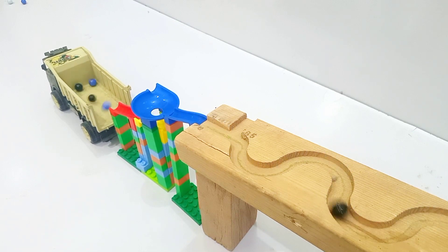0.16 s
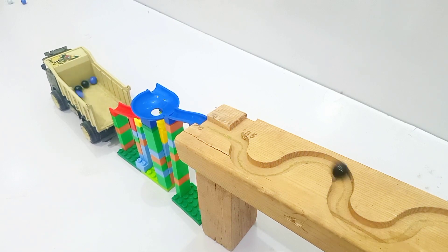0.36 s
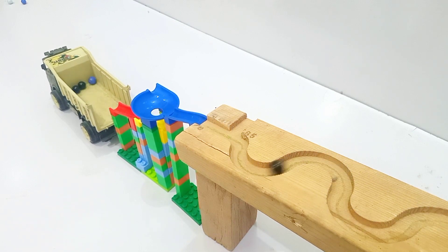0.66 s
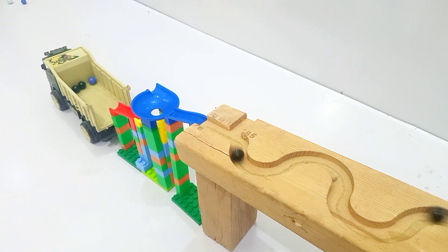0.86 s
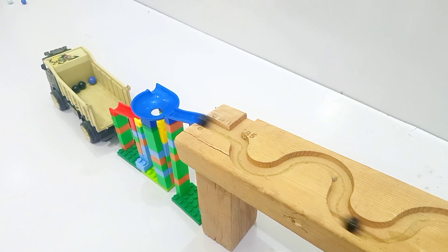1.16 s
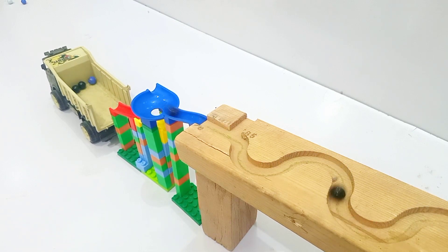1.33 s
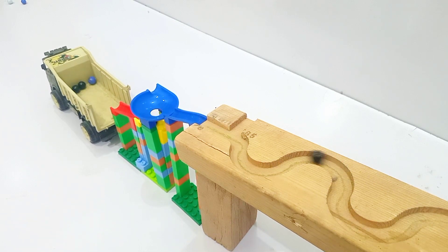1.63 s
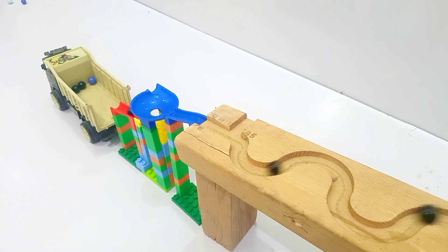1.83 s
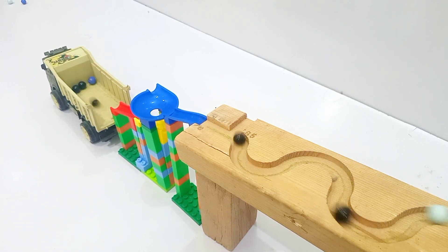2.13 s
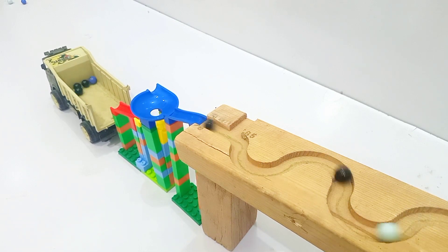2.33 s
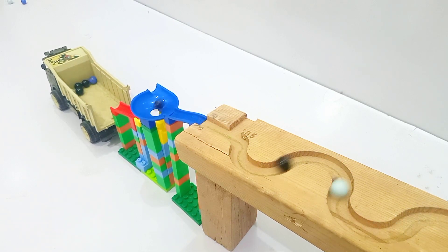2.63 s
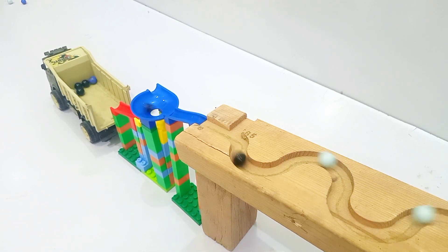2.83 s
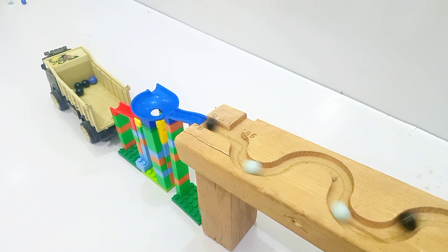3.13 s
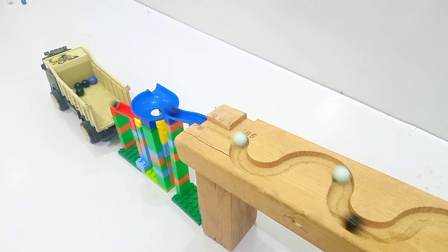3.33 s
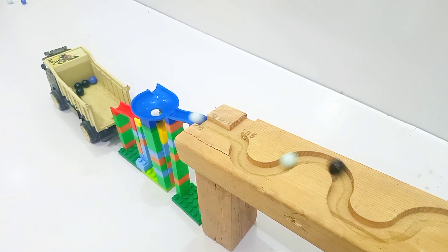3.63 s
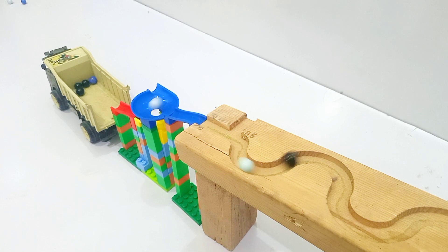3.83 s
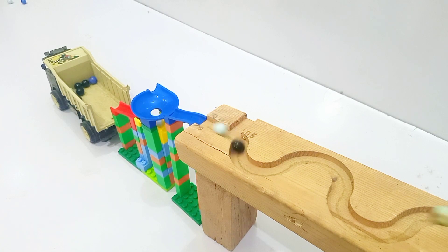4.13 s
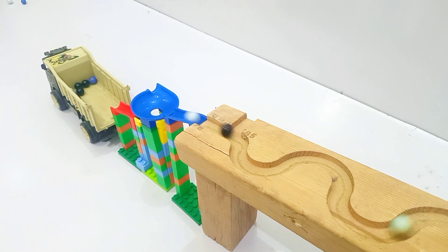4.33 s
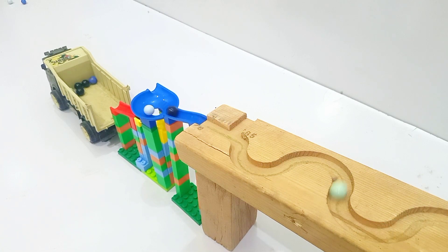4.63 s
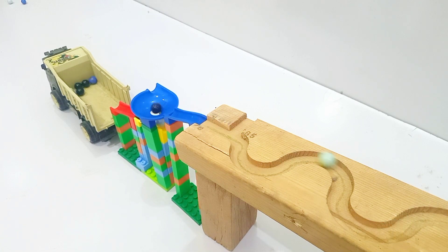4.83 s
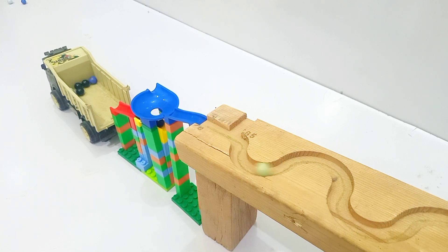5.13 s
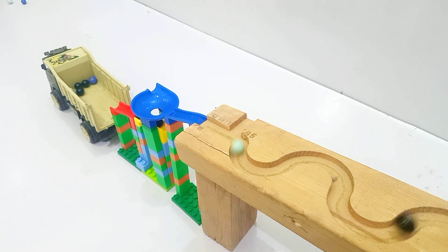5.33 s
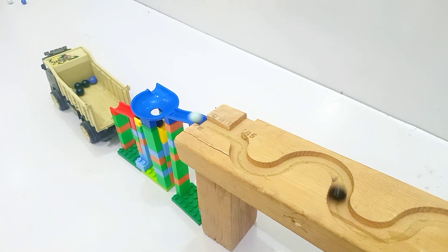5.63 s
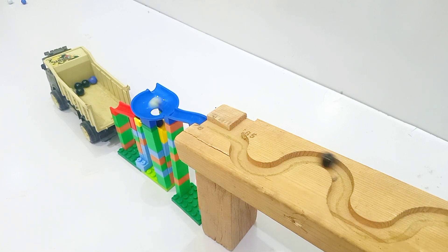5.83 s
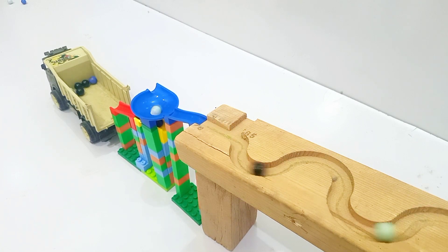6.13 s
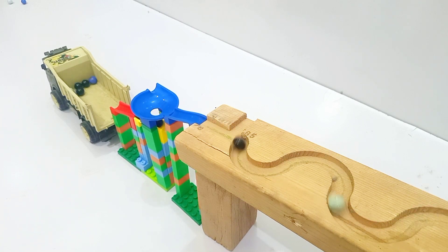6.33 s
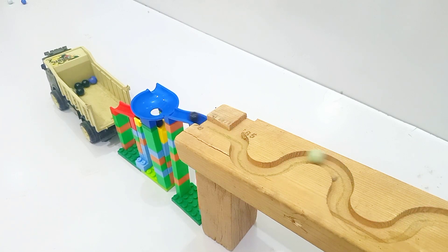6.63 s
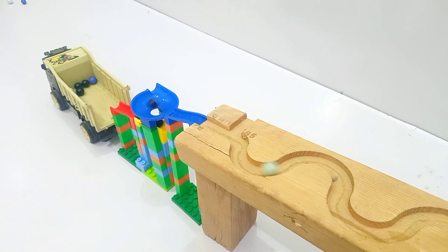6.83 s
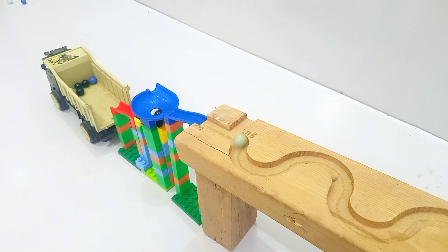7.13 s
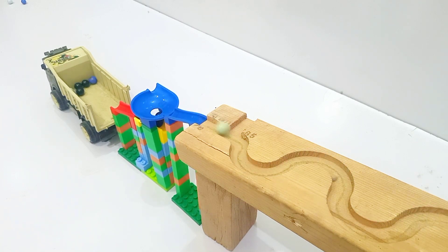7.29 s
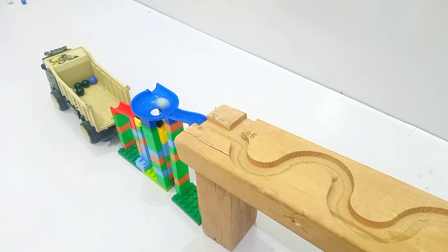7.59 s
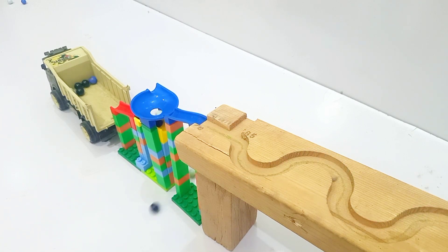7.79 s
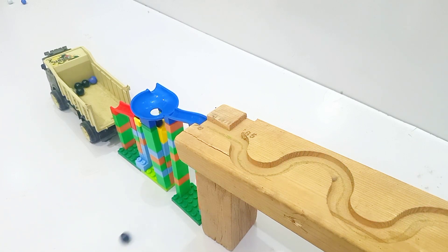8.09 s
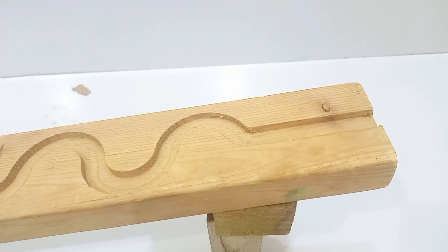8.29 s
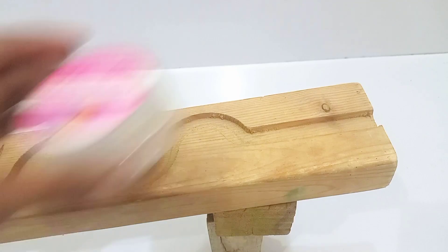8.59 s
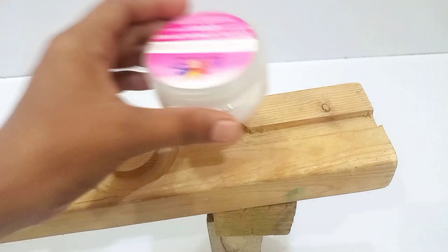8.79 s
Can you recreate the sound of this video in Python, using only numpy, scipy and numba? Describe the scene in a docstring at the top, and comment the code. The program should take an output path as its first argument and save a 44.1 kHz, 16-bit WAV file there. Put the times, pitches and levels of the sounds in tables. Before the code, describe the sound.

A marble run in a small hard room, heard from nearby: high, choked pings and hollow plastic rattles open busily, followed by faint wooden rolling, light taps, plastic ticks and an occasional hard snap of glass on glass. Two rapid tumbles through hollow plastic bricks come late. After a brief near-quiet, marbles knock and scrape in a lifted plastic tub, closer and drier, until the abrupt end. Only still air lies beneath.

```python
"""Marble run in a small, hard room

Glass marbles roll down a winding groove in a wooden beam, ping against a pin, click through a plastic funnel
and drop into a toy truck or down a tower of bricks, now and then clacking against each other.
At the end a plastic tub of marbles is picked up close to the microphone.
Blows are short noise bursts ringing a body's spectrum, rolling is a stream of tiny knocks, the pin and the
beam are decaying sines; noise echoes make the room, over still air, a faint low drone and brief tones."""
import sys
import numpy as np
from scipy import signal
from scipy.fft import rfft, irfft
from scipy.io import wavfile
from scipy.ndimage import uniform_filter1d
from numba import njit

SR = 44100
rng = np.random.default_rng(int(sys.argv[2]) if len(sys.argv) > 2 else 0)


def int16_out(signal):
    """Quantize to a 16-bit WAV file."""
    q = np.round(np.clip(np.atleast_2d(signal).T, -1, 1) * 32767)
    wavfile.write(sys.argv[1], SR, q.astype(np.int16))


N = 394682
TAPS = 2048  # length of a body's impulse response, samples
FREQS = np.fft.rfftfreq(TAPS, 1 / SR)
TIME = np.arange(N) / SR


def undb(db):
    """Amplitude for a level in dB."""
    return 10 ** (np.asarray(db) / 20)


def unit(x):
    """Scale to unit energy."""
    return x / np.sqrt(np.sum(x ** 2))


def steady(x):
    """Scale to unit rms."""
    return unit(x) * np.sqrt(N)


def add(out, s, x):
    """Mix x into out from time s on."""
    i = max(int(s * SR), 0)
    out[i:i + len(x)] += x[:max(N - i, 0)]


def swell(middle_s, length_s):
    """A level that rises, holds and fades."""
    offset = 2 * (TIME - middle_s) / length_s
    return np.exp(-np.minimum(np.square(np.square(offset)), 50))


def fading(s, attack_s, fade_s):
    """A level that rises from time s on and dies away."""
    t = np.maximum(TIME - s, 0)
    return (1 - np.exp(-t / attack_s)) * np.exp(-t / fade_s)


def held(start_s, end_s, edge_s):
    """A level that rises at the start, holds, and falls at the end."""
    return (np.tanh((TIME - start_s) / edge_s) - np.tanh((TIME - end_s) / edge_s)) / 2


def shape(points, rings=()):
    """A spectrum in dB with resonances standing on it."""
    hz, db = np.transpose(points)
    colour = np.interp(np.log(FREQS + 1), np.log(hz), db)
    return colour + sum(lift / (1 + (2 * (FREQS - f) / width) ** 2) for f, width, lift in rings)


def response(db):
    """Causal (minimum-phase) impulse response of unit energy for a spectrum in dB."""
    cepstrum = irfft(np.log(undb(db)))
    cepstrum[1:TAPS // 2] *= 2
    cepstrum[TAPS // 2 + 1:] = 0
    return unit(irfft(np.exp(rfft(cepstrum))))


def through(x, ring):
    """Pass x through an impulse response."""
    return signal.oaconvolve(x, ring)[:len(x)]


@njit
def bandpass(x, hz, width):
    """State-variable resonance whose centre may move; width is a share of the centre."""
    y, band, low = np.empty(len(x)), 0., 0.
    for i in range(len(x)):
        g = np.tan(np.pi * hz[i] / SR)
        v = (band + g * (x[i] - low)) / (1 + g * (g + width))
        band, low, y[i] = 2 * v - band, low + 2 * g * v, width * v
    return y


# Time to fall by 60 dB: body of the echoes, their treble, and a weak dull tail alongside, with its level
ROOM_T60_S, ROOM_TREBLE_T60_S, ROOM_DULL_T60_S, ROOM_DULL_DB = 0.33, 0.21, 0.3, -23.5


def room(build_s=0.0059, split_hz=6000):
    """The room's echoes from one spot: they build up, the treble dies first, with a weak dull tail."""
    t = TIME[:SR * 2 // 3]

    def fade(t60):
        """Exponential decay by 60 dB in t60 seconds."""
        return np.exp(-np.log(1000) * t / t60)

    noise = rng.standard_normal(len(t))
    low = signal.sosfilt(signal.butter(1, split_hz, fs=SR, output="sos"), noise)
    lowpass = signal.butter(2, split_hz / 2, fs=SR, output="sos")
    dull = signal.sosfilt(lowpass, rng.standard_normal(len(t)))
    tail = low * fade(ROOM_T60_S) + (noise - low) * fade(ROOM_TREBLE_T60_S)
    tail = tail + undb(ROOM_DULL_DB) * dull * fade(ROOM_DULL_T60_S)
    return unit(tail * (1 - np.exp(-(t / build_s) ** 2)))


def in_room(x, room_db):
    """A sound together with its echoes."""
    return x + undb(room_db) * through(x, room())


def contact(scatter_s, snap, touch_s=.0003):
    """The marble presses in and snaps, then waves scatter through the thing; even in colour overall."""
    t = TIME[:TAPS]
    burst = unit(rng.standard_normal(TAPS) * np.exp(-t / scatter_s) * (1 - np.exp(-t / touch_s)))
    burst[int(touch_s * SR)] += snap
    uneven = uniform_filter1d(np.abs(rfft(burst)) ** 2, size=33)
    return unit(through(burst, response(-10 * np.log10(uneven))))


def slaps(size, count=5):
    """First echoes off the table and the things on it, 2 to 17 ms late."""
    echoes = np.zeros(TAPS)
    echoes[rng.integers(SR // 500, SR // 60, count)] = size * rng.uniform(-1, 1, count)
    echoes[0] = 1
    return echoes


def spot(uneven_db, spacing_hz=380, count=14):
    """Every spot of a thing favours other modes: a random ripple in dB with a few sharp peaks."""
    knots = np.cumsum(spacing_hz * np.geomspace(.4, 3, num=48))
    zigzag = np.resize([1, -1], len(knots)) * rng.choice([-1, 1])
    ripple = np.interp(FREQS, knots, zigzag * rng.uniform(0, 2, len(knots)))
    peak_hz = np.geomspace(1100, 8000, num=count) * rng.uniform(.93, 1.07, count)
    peaks = sum(rng.uniform(1, 2) / (1 + ((FREQS - f) / (.012 * f)) ** 2) for f in peak_hz)
    return uneven_db * (ripple + peaks)


def blows(rows, body, walls, scatter_s, snap, room_db, gain_db, slap, tint_db,
          lows_share=0, highs_share=0, ring_hz=1000, ring_width_hz=300, ring_db=0):
    """Each blow rings the body and wakes the room from its own spot; brightness tilts its colour."""
    out = np.zeros(N)

    def blow(s, db, bright_db=0, own_hz=ring_hz, own_room_db=0):
        """One contact; its brightness lifts the top fully, the highs in part, and thins the lows."""
        lows, highs, top = np.array(tint_db) + bright_db * np.array([-lows_share, highs_share, 1])
        tint = shape([(950, lows), (1800, 0.011), (3300, 0), (4800, highs), (7200, highs), (9500, top)])
        push = undb(room_db + own_room_db) * room()
        push[:TAPS] += unit(through(contact(scatter_s, snap), slaps(slap)))
        colour = shape(body, walls + [(own_hz, ring_width_hz, ring_db)])
        sound = through(push, response(colour + tint + spot(uneven_db=4)))
        # unit energy packed into a hundredth of a second would have unit rms there
        add(out, s, sound * undb(db + gain_db) * np.sqrt(SR / 100))

    for row in rows:
        blow(*row)
    return out


def rattle(body, walls, per_s, spread_db, count=5):
    """Tiny knocks of a rolling marble, uneven in size, shared among a few spots of the body."""
    out = 0
    for _ in range(count):
        hits = (rng.random(N) < per_s / count / SR) * rng.choice([-1, 1], N)
        sizes = undb(spread_db * np.minimum(rng.exponential(size=N), 3))
        out = out + through(hits * sizes, response(shape(body, walls) + spot(uneven_db=4)))
    return out


# Still air in the room. Each row: frequency in Hz, level in dB.
AIR_COLOUR = [(25, -20), (60, -5), (120, -0.5), (230, -2), (400, -8.5), (1000, -9), (2000, -17),
              (4000, -16), (7200, -17), (8200, -31), (12000, -34), (16000, -38)]
AIR_DB = -73.5
# A faint low drone. Each row: middle in seconds, length in seconds, pitch in Hz, level in dB.
DRONE_SWELLS = [(0.517, 0.36, 141, -65), (1.734, 0.16, 128, -63.5), (2.172, 0.086, 225, -60),
                (3.417, 1.42, 138.4, -61.5), (4.3, 0.28, 135, -65), (4.98, 0.53, 85.4, -66),
                (5.413, 0.07, 72, -67), (7.942, 0.21, 223, -69.5), (8.537, 0.22, 77, -69.5),
                (8.834, 0.18, 242, -60.5)]
DRONE_EDGE_S = 0.029
# Faint tones that swell and fade. Each row: middle in seconds, length in seconds, pitch in Hz, level in dB.
FAINT_TONES = [(1.29, 0.043, 223, -61), (1.625, 0.13, 223, -65), (3.251, 1.0, 174, -66),
               (3.5, 1.6, 121.6, -63), (3.89, 0.4, 175.5, -52.5), (4.356, 0.089, 123, -51.5),
               (5.283, 0.14, 514, -57.5), (5.697, 0.078, 984, -66), (8.305, 0.11, 227, -58.5)]


def background(drone_width=0.39):
    """Still air as tinted noise, a drone as noise through two resonances, and brief sine tones."""
    noise, drone = rng.standard_normal(N), 0
    for s, length, f, db in DRONE_SWELLS:
        hz = np.full(N, float(f))
        hum = steady(bandpass(bandpass(noise, hz, drone_width), hz, drone_width))
        drone = drone + undb(db) * held(s - length / 2, s + length / 2, DRONE_EDGE_S) * hum
    tones = sum(undb(db) * swell(s, length) * np.sin(2 * np.pi * f * TIME)
                for s, length, f, db in FAINT_TONES)
    air = through(rng.standard_normal(N), response(shape(AIR_COLOUR)))
    return drone + tones + undb(AIR_DB) * air


# One row a marble: leaves the beam in seconds, rolling in the groove in dB, circling the funnel in dB.
MARBLES = [(1.27, -64, -55.5), (2.45, -64, -58), (3.2, -70.5, -74), (3.62, -65, -67), (4.24, -71.5, -80),
           (4.45, -65.5, -69), (5.68, -65, -67.5), (6.68, -74.5, -66), (7.4, -72.5, -74)]
GROOVE_RUN_S, GROOVE_FADE_S = 1.89, 0.076
FUNNEL_RISE_S, FUNNEL_FADE_S = 0.029, 0.1
CHATTER_DB, CHATTER_S = -25.5, 0.027  # in the groove after a ping, against the level in the ping's row


def rolling_level():
    """Each marble runs the groove, then circles the funnel, and chatters after a ping; powers add."""
    power = 0
    for s, groove_db, funnel_db in MARBLES:
        running = undb(groove_db) * held(s - GROOVE_RUN_S, s, GROOVE_FADE_S)
        # doubled, the rise and fade peak at about one
        circling = undb(funnel_db) * 2 * fading(s, FUNNEL_RISE_S, FUNNEL_FADE_S)
        power = power + running ** 2 + circling ** 2
    for s, db, _ in PINGS:
        power = power + (undb(db + CHATTER_DB) * fading(s, attack_s=0.0015, fade_s=CHATTER_S)) ** 2
    return np.sqrt(power)


# The wooden groove's colour. Each row: frequency in Hz, level in dB.
GROOVE_BODY = [(150, -15.5), (230, -2), (330, -1), (600, 1.5), (1000, -6.5), (1500, -1), (2200, -11),
               (3300, -13.5), (5000, -23.5), (7500, -28), (9000, -38), (14000, -43.5)]
# Its resonances. Each row: frequency in Hz, width in Hz, lift in dB.
GROOVE_RINGS = [(629.5, 14, 6), (985, 43, 14.5), (1625, 110, 10.5), (1760, 32, 3.5), (2518, 390, 15.5),
                (3450, 54, 1.5), (4340, 70, 5)]
# Light knocks of marbles on the run. Each row: start in seconds, level in dB before gain.
RUN_KNOCKS = [(0.723, -58), (0.821, -40.5), (0.845, -55), (0.923, -37), (1.198, -50), (1.291, -35),
              (1.312, -52), (1.36, -33), (1.41, -53), (1.531, -63), (2.004, -53.5), (2.06, -48),
              (2.91, -56), (3.178, -40), (4.773, -44.5), (6.225, -46.5), (6.243, -44.5), (6.469, -39),
              (7.571, -40), (8.121, -39), (8.199, -43.5)]
# Tint of these knocks: lows, highs and top, in dB.
RUN_TINT_DB = (-3.5, 7, 3)


def groove(sway_db=5.5, soft_hz=5000):
    """Marbles rumble over the wood grain, their level wavering at random, with light knocks on the run."""
    sway_times = np.arange(0, TIME[-1], 1 / 14)  # a random level 14 times a second
    sway = undb(sway_db * np.interp(TIME, sway_times, rng.standard_normal(len(sway_times))))
    grain = rattle(GROOVE_BODY, GROOVE_RINGS, per_s=1100, spread_db=7) * sway
    # glass on wood is a soft contact: little treble
    grain = signal.sosfilt(signal.butter(2, soft_hz, fs=SR, output="sos"), grain)
    knocks = blows(RUN_KNOCKS, GROOVE_BODY, GROOVE_RINGS, scatter_s=0.0037, snap=0.37, room_db=-15.5,
                   gain_db=-14.0, slap=0.72, tint_db=RUN_TINT_DB)
    return steady(in_room(grain, room_db=1.5)) * rolling_level() + knocks


# Pings on the pin. Each row: start in seconds, level in dB before gain,
# gap to the first rebound in seconds (0 = a single ping with no computed rebounds).
PINGS = [(0.014, -40, 0), (0.0493, -22.5, 0), (0.097, -27.5, 0), (0.1353, -42.5, 0), (0.3857, -21.5, 0),
         (0.5093, -30.5, 0), (0.5613, -33.5, 0), (0.875, -42, 0), (0.9585, -40.5, 0), (0.9748, -34, 0),
         (1.0153, -30.5, 0), (1.0899, -46, 0), (1.871, -54, 0), (2.393, -20.5, .0777),
         (3.2705, -25.5, .0355), (3.9111, -40, 0), (5.4451, -54, 0), (5.4554, -54.5, 0)]
REBOUND_SHARE, REBOUND_LOSS_DB, SHORTEST_REBOUND_S = .68, 6, .023


def rebounds():
    """Every ping as start and level; in a run of rebounds gaps shrink by a fixed share, the level falls."""
    for s, db, gap in PINGS:
        yield s, db
        while gap > SHORTEST_REBOUND_S:
            s, db, gap = s + gap, db - REBOUND_LOSS_DB, gap * REBOUND_SHARE
            yield s, db


PIN_HZ = 2591  # mean pitch; each ping is slightly off it
# Modes of the beam that holds the pin. Each row: frequency in Hz, mean level in dB against the pin's note,
# time to fall by 60 dB in seconds.
BEAM_MODES = [(990, -48, .15), (1615, -25, 0.41), (2000, -49, 0.097), (2450, -24, 0.071), (2620, -21, 0.13),
              (3120, -42, .17), (3250, -42.5, .05), (3300, -22.5, .22), (3730, -31.5, 0.17),
              (3640, -21.5, 0.035), (4210, -18, 0.13), (4580, -34.5, 0.19), (4250, -25, 0.074),
              (5580, -30.5, 0.028), (5960, -29.5, 0.044), (7050, -35.5, 0.21)]


def pin(hold_s=0.011, swell_s=0.001, first_share=0.51, touch_s=0.00013,
        tick_db=-12, tick_s=0.0054, room_db=-4, gain_db=4):
    """The pin sings for a hundredth of a second and is choked; the beam's modes ring on."""
    out, t = np.zeros(N), TIME[:SR // 3]
    tick_colour = response(shape([(300, -8.5), (600, -9), (1500, 2.5), (3500, 16), (5000, -4.0),
                                  (6500, -12), (10000, -28.5), (16000, -44)]))
    for s, db in rebounds():
        rise = 1 + (first_share - 1) * np.exp(-t / swell_s)
        hz = PIN_HZ * (1 + 0.0053 * rng.standard_normal())
        note = np.sin(2 * np.pi * hz * t) * rise * np.exp(-(t / hold_s) ** 4)
        beam = 0
        for f, mode_db, t60 in BEAM_MODES:
            level = undb(mode_db + 2 * rng.standard_normal())
            wave = np.sin(2 * np.pi * (f * t + rng.random()))
            beam = beam + level * wave * np.exp(-np.log(1000) * t / t60)
        tick = undb(room_db) * room()[:len(t)]
        tick[:TAPS] += contact(tick_s, snap=0)
        tick = through(tick, tick_colour) * np.sqrt(np.sum(note ** 2))
        # the contact takes a moment, so the ring starts without a crack
        ring = in_room((note + beam) * (1 - np.exp(-(t / touch_s) ** 2)), room_db=-14.0)
        add(out, s, undb(db + gain_db) * (ring + undb(tick_db) * tick))
    return out


# The toy truck's colour. Each row: frequency in Hz, level in dB.
TRUCK_BODY = [(200, -29.5), (400, -10.5), (600, 3), (800, 1.5), (1200, 0.5), (1800, -5.5), (2600, -4),
              (3800, -6), (5500, -2), (7200, -7.5), (9000, -19.5), (13000, -36), (16000, -25.5)]
# Its wall resonances. Each row: frequency in Hz, width in Hz, lift in dB.
TRUCK_WALLS = [(640.5, 19, 10), (749, 44, 10.5), (974, 45, 5.5), (1141, 17, 9.5), (1600, 170, 5),
               (1960, 27, 1.5)]
# A marble rolls across the bed. Each row: start in seconds, length in seconds, level in dB before gain.
BED_ROLLS = [(0.186, 0.21, -31.5), (0.327, 0.27, -31), (2.162, 0.21, -33), (2.403, 0.084, -40.5),
             (3.564, 0.21, -32), (3.92, 0.05, -45.5)]
BED_HUM_START_HZ, BED_HUM_END_HZ = 1160, 794
BED_FALL_DB_PER_S, BED_ATTACK_S, BED_RELEASE_S = 36, .004, 0.0099


def truck_bed(rumble_width=0.61, rattle_db=-11, gain_db=-4):
    """A marble skips quickly over the ribbed bed; its hum sinks and fades as the marble slows."""
    out = 0
    skips = rattle(TRUCK_BODY, TRUCK_WALLS, per_s=900, spread_db=2.5)
    for s, length, db in BED_ROLLS:
        hz = np.interp(TIME, [s, s + length], [BED_HUM_START_HZ, BED_HUM_END_HZ])
        rumble = bandpass(bandpass(skips, hz, rumble_width), hz, rumble_width)
        t = np.maximum(TIME - s, 0)
        level = undb(db - BED_FALL_DB_PER_S * t) * (1 - np.exp(-t / BED_ATTACK_S))
        level = level * np.exp(-np.maximum(t - length, 0) / BED_RELEASE_S)
        out = out + steady(unit(rumble) + undb(rattle_db) * unit(skips)) * level
    return in_room(out, room_db=-14) * undb(gain_db)


# A marble lands and bounces in the bed. Each row: start in seconds, level in dB before gain, brightness in dB.
TRUCK_BLOWS = [(0.1933, -25.5, 4), (0.2097, -34, -6), (0.2209, -35.5, 5.5), (0.3013, -28, -3.5),
               (0.3261, -27.5, 5.5), (0.3454, -34.5, -26.5), (0.3543, -31, 8), (0.4221, -30.5, -2),
               (0.5457, -34, -12.5), (2.1664, -28, -1.5), (2.1827, -35, -12), (2.194, -36, 9.5),
               (2.2547, -30.5, -2.5), (3.5597, -26, 5.5), (3.5873, -35, 9.5), (3.6642, -33.5, 0),
               (3.7656, -33.5, 1.5)]
# Tint of a blow on the truck: lows, highs and top, in dB.
TRUCK_TINT_DB = (-5, -4.5, -3)


def truck_blows():
    """Marbles land in the truck bed and ring its walls; brighter blows have thinner lows."""
    return blows(TRUCK_BLOWS, TRUCK_BODY, TRUCK_WALLS, scatter_s=0.0027, snap=0.057, room_db=-1,
                 gain_db=-0.5, slap=0.068, tint_db=TRUCK_TINT_DB, lows_share=1.1, highs_share=0.29)


# The glass marbles' colour. Each row: frequency in Hz, level in dB.
GLASS_BODY = [(200, -30), (400, -22), (600, -23), (800, -27), (1200, -5), (1800, -4), (2600, -10.5),
              (3800, -10), (5500, 1), (7200, -4.5), (9000, -2.5), (13000, -19), (16000, -9.5)]
# Glass on glass. Each row: start in seconds, level in dB before gain, brightness in dB, ring in Hz,
# extra room in dB.
GLASS_CLACKS = [(0.5081, -32, 8, 6640, -1), (0.7717, -43.5, 9, 6240, -18), (2.3835, -32.5, 4.5, 6580, 0.5),
                (2.9857, -42.5, -24, 5400, -1), (3.7153, -30, 3.5, 7300, -5),
                (3.7979, -38.5, 5, 7500, -6.5), (4.2122, -48.5, -35, 4880, -2),
                (4.4043, -33, -1, 6440, -1.5), (5.1693, -35.5, -4, 6920, 0),
                (5.3147, -44.5, -11, 6740, -5.5), (6.2933, -35.5, -2, 6960, 2),
                (7.2334, -34, -7.5, 7470, -2), (7.8582, -32.5, 1.5, 6860, 2)]
# Tint of a clack: lows, highs and top, in dB.
GLASS_TINT_DB = (-2, -5, -5)


def glass_clacks():
    """Two marbles knock together: a sharp snap with one broad high ring."""
    return blows(GLASS_CLACKS, GLASS_BODY, [], scatter_s=0.0031, snap=1.0, room_db=.5, gain_db=-1, slap=0.26,
                 tint_db=GLASS_TINT_DB, highs_share=0.15, ring_width_hz=1700, ring_db=18)


# The plastic's colour, for chute and funnel too. Each row: frequency in Hz, level in dB.
PLASTIC_BODY = [(200, -12), (400, -25), (600, -0.5), (800, -2.5), (1200, -11), (1800, 4.5), (2600, 2.5),
                (3800, -0.5), (5500, -1.5), (7200, -4.5), (9000, -18.5), (13000, -31), (16000, -22)]
# Its wall resonances. Each row: frequency in Hz, width in Hz, lift in dB.
PLASTIC_WALLS = [(1284, 264, 21.9), (1525, 100, 10), (2310, 37, 4.7), (3400, 99, 6.2), (3860, 520, 4.7),
                 (5880, 86, 4.5), (6050, 450, 1.9)]
# Other knocks on the plastic. Each row: start in seconds, level in dB before gain, brightness in dB,
# ring in Hz, extra room in dB.
PLASTIC_KNOCKS = [(1.3536, -47.5, -5, 5300, -3), (1.6843, -46.5, 15.5, 2210, 10),
                  (1.849, -58, -30, 2050, 1), (2.5512, -35.5, -17, 1290, -4.5),
                  (2.7578, -35, 5.5, 1780, -5), (2.7744, -41.5, -35, 3520, -1.5),
                  (3.0594, -43.5, 16, 3040, 8.5), (3.3626, -39.5, -18, 4220, -6.5),
                  (4.2521, -41.5, 11, 2320, 4.5), (4.2625, -37, 10, 2100, -18),
                  (4.2795, -42, -15, 1410, 4.5), (4.6166, -42, -7, 1210, -1.5),
                  (4.9081, -50.5, -2, 1600, -1), (4.969, -41, 10.5, 1520, 9), (5.033, -37.5, -3, 1920, 4),
                  (5.04, -33.5, 14.5, 3220, -1), (5.5046, -50.5, -22, 3360, -11),
                  (5.7744, -54, -2, 1280, 0), (6.3768, -40, -27, 1570, 2.5), (7.0332, -36, 6, 1780, -7.5),
                  (7.4785, -50, 18, 2180, -2), (7.5149, -43.5, -20, 2150, 7), (7.6174, -51, -32, 1260, -4),
                  (7.9861, -48, 12, 2200, -5), (8.0214, -37.5, 2.5, 2110, 1.5),
                  (8.296, -54.5, -1, 4300, -0.5)]
# Tint of these knocks: lows, highs and top, in dB.
PLASTIC_TINT_DB = (-9, 0, 3)


def plastic_knocks():
    """Other knocks on the plastic, each with its own ring."""
    return blows(PLASTIC_KNOCKS, PLASTIC_BODY, PLASTIC_WALLS, scatter_s=0.0034, snap=0.44, room_db=-3.5,
                 gain_db=-1.5, slap=0.18, tint_db=PLASTIC_TINT_DB, highs_share=.15,
                 ring_width_hz=390, ring_db=9.5)


# A marble drops off the end of the beam. Each row: start in seconds, level in dB before gain.
CHUTE_DROPS = [(1.4666, -50), (2.6585, -44), (3.4766, -44), (3.8717, -40.5), (4.5322, -43), (5.8787, -48),
               (6.8711, -40.5), (7.6879, -48)]
# Tint of a drop: lows, highs and top, in dB.
CHUTE_TINT_DB = (-12.5, -2.5, 3)


def chute_drops():
    """Marbles drop onto the plastic chute, which rings near 2500 Hz."""
    return blows(CHUTE_DROPS, PLASTIC_BODY, PLASTIC_WALLS, scatter_s=0.0035, snap=0.44, room_db=-2.5,
                 gain_db=-.5, slap=0.22, tint_db=CHUTE_TINT_DB, ring_hz=2500, ring_width_hz=270, ring_db=14.5)


# A marble strikes the funnel's wall. Each row: start in seconds, level in dB before gain, extra room in dB.
FUNNEL_HITS = [(1.5766, -39, 3.5), (3.9715, -32, 0), (4.0418, -41.5, -2.5), (4.6351, -32, -11),
               (4.957, -41, 6), (5.9841, -42.5, 1.5), (6.0553, -50, -4), (6.9761, -33, 2.5),
               (7.185, -48, 4)]
# Tint of a hit: lows, highs and top, in dB.
FUNNEL_TINT_DB = (9, 10.5, 16)
FUNNEL_RING_HZ = 5770


def funnel_hits():
    """Marbles click on the wall of the funnel: short scatter, bright, with a high ring."""
    rows = [(s, db, 0, FUNNEL_RING_HZ, wet_db) for s, db, wet_db in FUNNEL_HITS]
    return blows(rows, PLASTIC_BODY, PLASTIC_WALLS, scatter_s=0.0012, snap=0.59, room_db=-5.5, gain_db=-1.0,
                 slap=0.5, tint_db=FUNNEL_TINT_DB, ring_width_hz=420, ring_db=6)


# The brick tower's colour. Each row: frequency in Hz, level in dB.
TOWER_BODY = [(200, -39.5), (400, -18.5), (600, -13), (800, -4.5), (1200, -1.5), (1800, -0.5), (2600, 0.5),
              (3800, -8), (5500, -4), (7200, -9), (9000, -21), (13000, -29), (16000, -29)]
# Its wall resonances. Each row: frequency in Hz, width in Hz, lift in dB.
TOWER_WALLS = [(950, 23, 1.3), (1378, 300, 4.6), (1423, 106, 3.2), (4070, 540, 7.6)]
# A marble rattles among the bricks. Each row: start in seconds, level near the peak in dB before gain.
BRICK_RATTLES = [(4.999, -54.5), (6.589, -33), (7.728, -30)]
RATTLE_SWELL_S, RATTLE_WIDTH_S, RATTLE_TAIL_DB, RATTLE_TAIL_S = 0.043, 0.042, -12.5, .13


def bricks(gain_db=-3):
    """The marble rattles against the hollow bricks: a quick swell, then a weak tail."""
    knocks = steady(rattle(TOWER_BODY, TOWER_WALLS, per_s=450, spread_db=-4.0))
    level = 0
    for s, db in BRICK_RATTLES:
        bump = np.exp(-np.abs(TIME - s - RATTLE_SWELL_S) / RATTLE_WIDTH_S)
        tail = undb(RATTLE_TAIL_DB) * fading(s, attack_s=.004, fade_s=RATTLE_TAIL_S)
        level = level + undb(db) * (TIME > s) * (bump + tail)
    return in_room(knocks * level, room_db=-2) * undb(gain_db)


# A marble tumbles down the tower. Each row: start in seconds, level in dB before gain, brightness in dB.
TOWER_BLOWS = [(6.5869, -24.5, 3), (6.621, -36, 2), (6.647, -28, 0.5), (7.7252, -26.5, 1.5),
               (7.7417, -30, 3), (7.7538, -29.5, 7), (7.7932, -30, 8.5), (7.8004, -24.5, -2.5)]
# Tint of a blow on the bricks: lows, highs and top, in dB.
TOWER_TINT_DB = (10.5, -0.5, 10)


def tower_blows():
    """Marbles tumble down the brick tower with hard, snapping blows."""
    return blows(TOWER_BLOWS, TOWER_BODY, TOWER_WALLS, scatter_s=0.0017, snap=0.94, room_db=-2.5,
                 gain_db=-0.5, slap=0.16, tint_db=TOWER_TINT_DB, lows_share=0.15, highs_share=0.94)


# The plastic tub's colour. Each row: frequency in Hz, level in dB.
TUB_BODY = [(200, -30.5), (400, -18.5), (600, -6), (800, 3), (1200, -7.5), (1800, -8.5), (2600, -8.5),
            (3800, -8), (5500, -4), (7200, -15), (9000, -25.5), (13000, -45.5), (16000, -38)]
# Its wall resonances. Each row: frequency in Hz, width in Hz, lift in dB.
TUB_WALLS = [(614, 36, 4.5), (746, 150, 4.5), (826, 61, -0.5), (935, 124, 11.5), (1304, 140, 9.5),
             (1740, 130, 8.5), (3160, 24, 3), (3514, 53, 7), (6100, 250, 1), (7060, 570, 10.5)]
# Marbles knock about in the tub. Each row: start in seconds, level in dB before gain, brightness in dB.
TUB_BLOWS = [(8.4188, -35, -13), (8.4242, -43.5, 11), (8.5381, -48, 3), (8.5921, -27.5, 2),
             (8.6308, -29.5, -2), (8.6455, -34.5, -6), (8.7423, -31.5, -1), (8.7476, -24.5, 1),
             (8.7827, -29, 2), (8.8028, -31.5, -1), (8.8093, -31.5, -2), (8.8394, -24.5, 3.5),
             (8.8881, -30, -3), (8.9207, -26.5, 6.5), (8.9469, -30, 0)]
# Tint of a blow on the tub: lows, highs and top, in dB.
TUB_TINT_DB = (1.5, -0.5, 3)


def tub_blows():
    """Marbles knock about in the tub, close to the microphone: long scatter and little room."""
    return blows(TUB_BLOWS, TUB_BODY, TUB_WALLS, scatter_s=0.0057, snap=0.42, room_db=-11.5, gain_db=-0.5,
                 slap=0.11, tint_db=TUB_TINT_DB, lows_share=0.16, highs_share=0.2)


SLIDE_START_S, SLIDE_DB = 8.745, -40.5


def sliding():
    """Between the knocks the marbles scrape over the floor of the lifted tub."""
    scrape = steady(rattle(TUB_BODY, TUB_WALLS, per_s=430, spread_db=1.5, count=2))
    return scrape * undb(SLIDE_DB) * held(SLIDE_START_S, TIME[-1] + 1, edge_s=0.011)


def scene():
    """The quiet room, the rolling and the pings, with blows on truck, glass, plastic, tower and tub."""
    beam = groove() + pin()
    truck = truck_bed() + truck_blows()
    plastic = plastic_knocks() + chute_drops() + funnel_hits()
    tower = bricks() + tower_blows()
    tub = tub_blows() + sliding()
    return (background() + beam + truck + glass_clacks() + plastic + tower + tub)[None]


TOP_HZ = 15950


def record(dry):
    """The recorder thins the deepest bass and cuts the very top."""
    thin = signal.sosfilt(signal.butter(2, 48, "high", fs=SR, output="sos"), dry)
    return signal.sosfilt(signal.ellip(10, .2, 80, TOP_HZ, fs=SR, output="sos"), thin)


dry = scene()
out = record(dry)
int16_out(out)
```